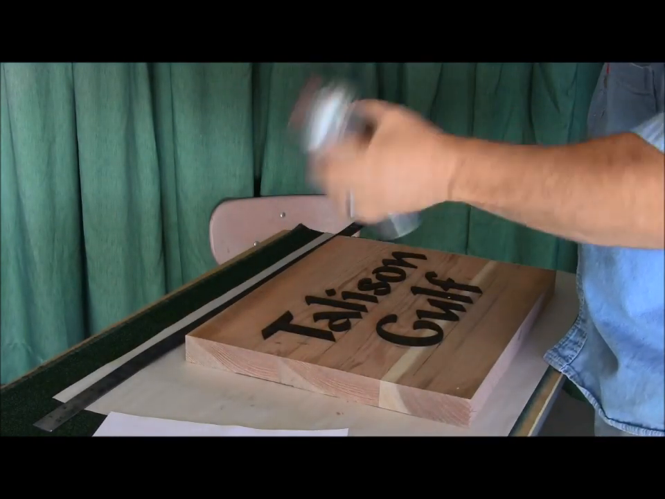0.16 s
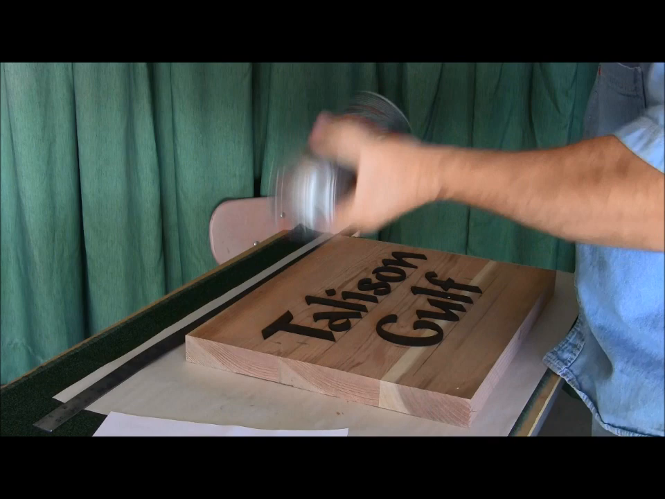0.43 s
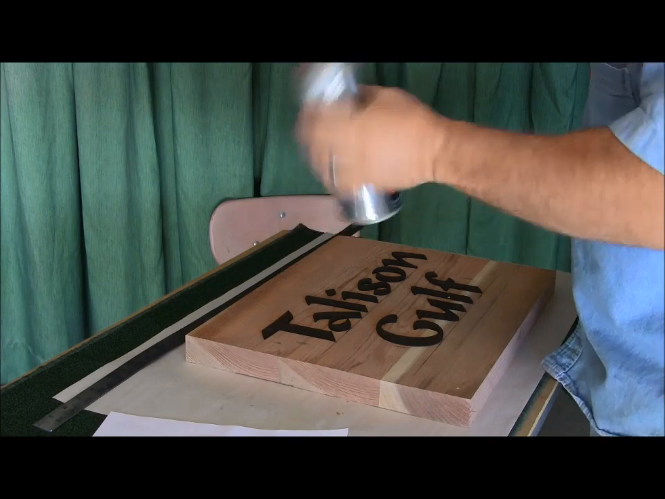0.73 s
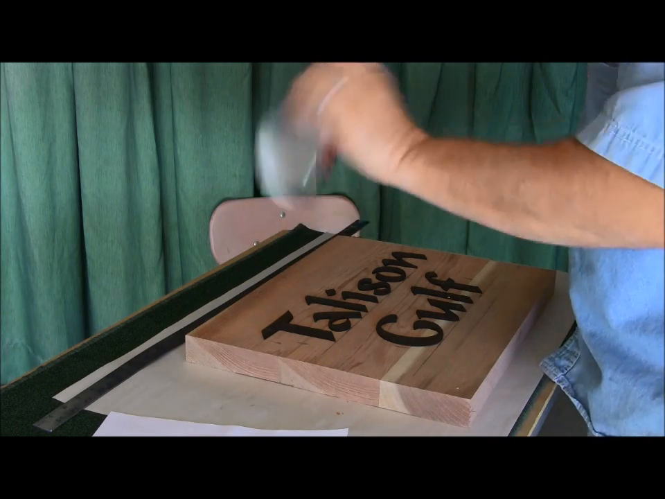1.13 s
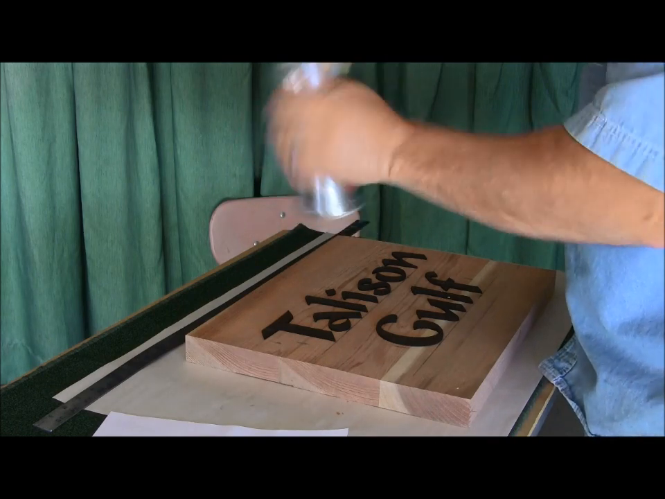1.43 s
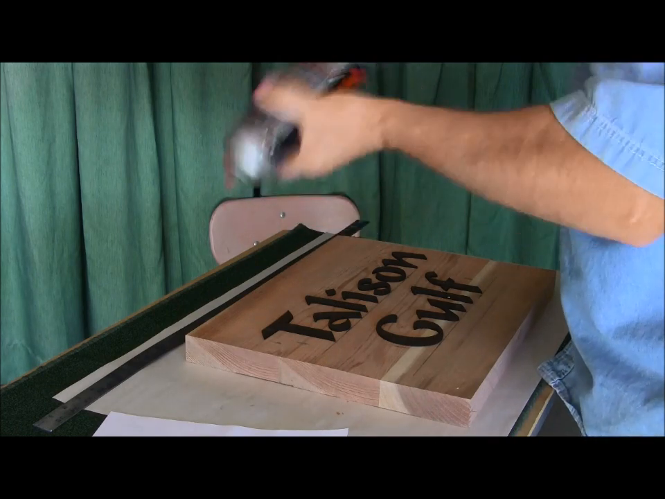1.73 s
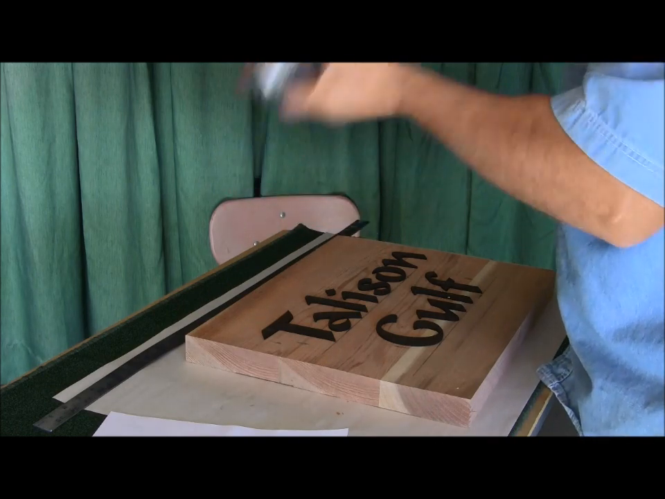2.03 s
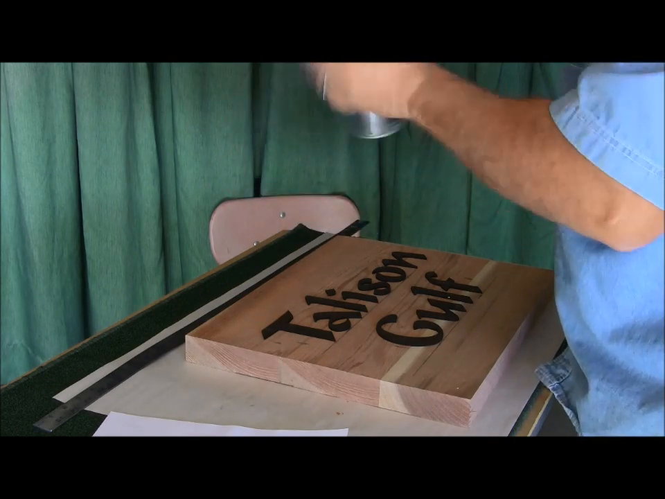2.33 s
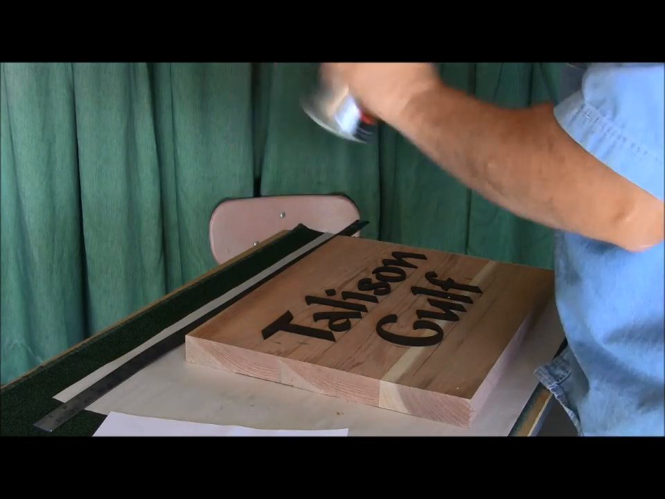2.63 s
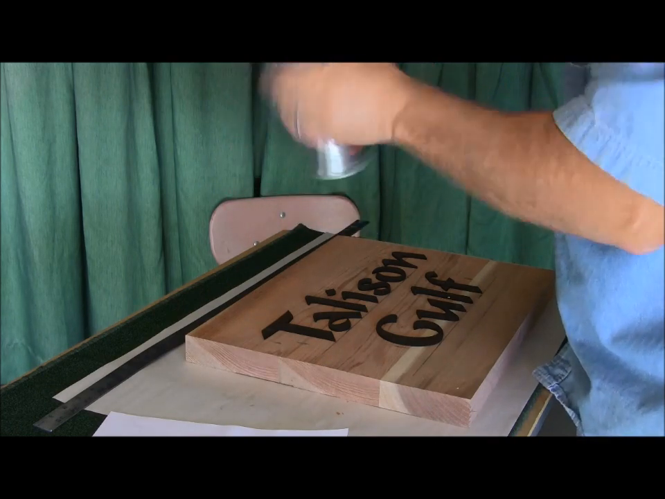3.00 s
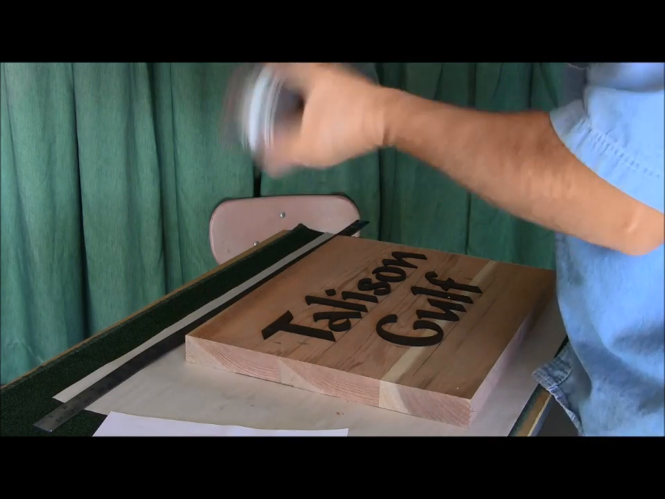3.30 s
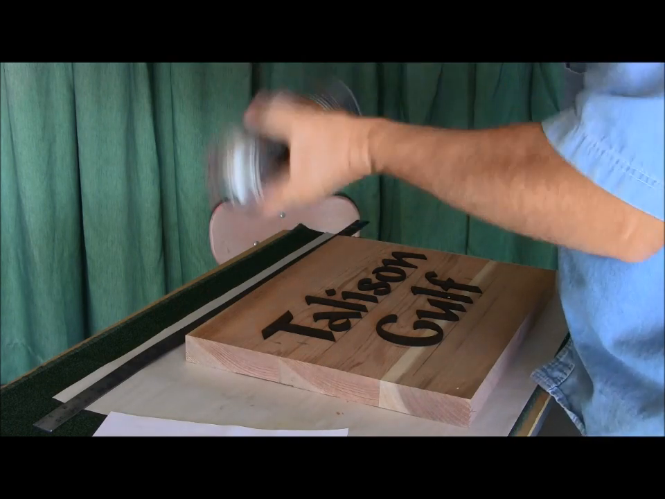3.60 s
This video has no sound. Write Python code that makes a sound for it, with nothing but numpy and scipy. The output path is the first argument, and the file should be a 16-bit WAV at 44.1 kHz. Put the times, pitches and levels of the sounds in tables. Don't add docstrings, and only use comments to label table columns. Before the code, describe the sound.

A steel mixing ball clatters in a vigorously shaken aerosol can, hard bright clacks mixed with quick rebounds, ticks and soft liquid-cushioned knocks, continuous from start to end, close microphone in a small workshop.

```python
import sys
import numpy as np
from scipy import signal
from scipy.fft import rfft, irfft, next_fast_len
from scipy.io import wavfile

SR = 44100
rng = np.random.default_rng(int(sys.argv[2]) if len(sys.argv) > 2 else 0)


def gain_from_db(level_db):
    decades = np.asarray(level_db, float) / 20
    return 10 ** decades


def unload_audio(sound):
    columns = np.transpose(np.atleast_2d(sound))
    steps = np.round(np.clip(columns, -1, 1) * 32767)
    wavfile.write(sys.argv[1], SR, steps.astype(np.int16))


N = 165375

# (frequency [Hz], level [dB])
SHELL_MODES = [(780, -34), (1050, -20.5), (1320, -12.5), (1650, -19.5), (2100, -5.5), (2750, -5),
               (3400, 0.5), (4200, 1.5), (4900, -2.5), (6100, 1)]
# (delay [s], level [dB])
ECHOES = [(.0052, -13)]
# (time [s], level [dB], strongest shell mode [Hz])
SOFT_KNOCKS = [(0.071, -20, 1780), (0.083, -25, 1980), (0.332, -13.5, 1720), (0.349, -21, 1650),
               (0.624, -13.5, 2410), (0.914, -18, 1030), (0.931, -18, 2010), (1.041, -8.5, 2340),
               (1.397, -9.5, 2470), (1.41, -9.5, 1840), (1.668, -3.5, 2200), (1.715, -0.5, 2400),
               (1.722, -8, 2130), (1.788, -19, 2120), (1.931, -19, 1470), (1.944, -15, 2280),
               (2.186, -18, 2290), (2.206, -15, 2310), (2.24, -11, 2280), (2.465, -15, 1840),
               (2.479, -23.5, 930), (2.485, -16, 1950), (2.511, -7, 2000), (2.739, -17, 1850),
               (2.747, -13, 2090), (2.815, -4.5, 2130), (3.027, -8.5, 2010), (3.121, -8.5, 2360),
               (3.142, -15.5, 1950), (3.567, -9, 1960)]
# (time [s], level [dB], strongest shell
# mode [Hz], crack level relative to the ring [dB])
EARLY_BLOWS = [(0.118, -5.5, 3790, -2), (0.136, -3, 3570, -8.5), (0.1824, -5.5, 3600, -17),
               (0.2814, -6.5, 4720, -17), (0.3962, -2, 3940, -5.5), (0.429, -3, 4000, -9),
               (0.525, -8.5, 4800, -15), (0.636, -11, 3350, -3.5), (0.6477, -3, 3280, -7),
               (0.6703, -4.5, 3800, -21), (0.6806, -4, 4400, -23), (0.7315, -1.5, 4850, -18),
               (0.7586, -6, 3120, -12), (0.7825, -7.5, 3800, -26), (0.7888, -9.5, 4000, -32),
               (0.8474, -4.5, 5170, -21), (0.956, -2, 3870, -11.5), (0.9672, -4.5, 4250, -13),
               (0.9887, -3.5, 3240, -10), (1.0784, -1.5, 4080, -14), (1.101, -25, 4160, -13),
               (1.117, -4.5, 3350, -17), (1.1648, -3, 3100, -9.5), (1.1915, -3.5, 4520, -11),
               (1.238, -4.5, 3400, -13), (1.2761, -7, 3480, -9), (1.324, -2.5, 3170, -15),
               (1.328, -9, 3920, -31), (1.3914, -5.5, 3380, -16)]
MIDDLE_BLOWS = [(1.442, -4.5, 2820, -3.5), (1.503, -5, 3700, -13.5), (1.5399, -6, 4040, -10),
                (1.564, -4, 3150, -14), (1.6148, -1.5, 3670, -14), (1.6308, -5.5, 3400, -12),
                (1.738, -6.5, 3230, 0.5), (1.755, -12, 3830, -26), (1.7606, -7.5, 3420, -28),
                (1.8125, -5, 3980, -3.5), (1.8516, -5.5, 3420, -25), (1.8848, -5, 3200, -12),
                (1.889, -19, 4130, -30), (1.9103, -4.5, 4170, -60), (1.9214, -7, 3250, -14),
                (1.9584, -4.5, 2430, -5), (1.9788, -9, 2300, 3), (2.017, -6.5, 3520, -10),
                (2.0569, -7, 3580, -1), (2.1032, -9.5, 4600, -31), (2.135, -11, 3900, -30),
                (2.1475, -9, 3220, -56), (2.1771, -6.5, 4040, -12.5), (2.2211, -4.5, 3660, -7.5),
                (2.3317, -1, 4310, -15.5), (2.435, -5, 3400, -23), (2.5012, -7, 3670, 0),
                (2.5322, -1.5, 3060, -16)]
LATE_BLOWS = [(2.578, -3, 3600, -9), (2.6015, -8, 3470, -31), (2.6332, -6, 3070, -14),
              (2.6476, -4, 4120, -18), (2.695, -5, 3450, -23), (2.7575, -1.5, 3540, -12),
              (2.781, -6.5, 3400, -6), (2.848, -2.5, 3600, -7.5), (2.931, 1, 4020, -16),
              (2.9405, -22, 3400, -1), (2.9546, -13, 3400, -10), (2.9663, -8, 3480, -36),
              (3.059, -2, 3750, -4.5), (3.078, -9, 3330, -22), (3.1809, -3, 3250, -5.5),
              (3.217, -3, 3380, -12.5), (3.2263, -5, 3150, -16), (3.2651, -5.5, 3040, -9),
              (3.2841, -3.5, 3530, -11), (3.3388, -2, 3110, -14), (3.3703, -1.5, 4830, -14),
              (3.427, -6, 3950, -9), (3.4442, -1.5, 4320, -32), (3.4947, -2.5, 2460, -15),
              (3.5427, -11.5, 2210, -30), (3.5789, 0, 3540, -15.5), (3.6726, -3.5, 3870, -3.5),
              (3.6941, -7, 4500, -7)]
# (time [s], level [dB])
JOLTS = [(0.12, -12), (0.649, -18), (1.0775, -10), (1.1646, -2), (1.324, -11), (1.502, -8), (1.614, -17),
         (1.737, -14), (1.814, -16), (1.991, -21), (2.648, -9), (2.931, -3.5), (3.079, -5), (3.181, -12),
         (3.284, -13), (3.694, -15)]
# (time [s], level [dB])
TAPS = [(0.1309, -14), (0.4209, -19), (0.5867, -17), (0.7163, -11.5), (0.7483, -14.5), (1.5093, -16),
        (1.7397, -11), (1.7689, -19.5), (1.8891, -26), (1.9961, -12), (2.1884, -17), (2.2862, -14),
        (2.3339, -24), (2.3394, -26), (2.5236, -16), (2.6478, -17), (2.7038, -23), (2.7224, -20),
        (2.7531, -22), (2.7824, -23), (2.7895, -20), (3.1808, -17), (3.2176, -20), (3.2369, -23),
        (3.249, -22), (3.3486, -16), (3.3712, -14), (3.515, -14), (3.5982, -25), (3.6338, -10)]
# (time [s], level [dB])
TICKS = [(0.1547, -9), (0.229, -14), (0.2375, -15), (0.2898, -14.5), (0.4491, -12.5), (0.4559, -10.5),
         (0.5162, -8), (0.53, -11.5), (0.737, -8.5), (0.799, -15), (0.8109, -7), (0.9675, -3.5),
         (1.1028, -4), (1.1075, -16), (1.2283, -7), (1.368, -13.6), (1.372, -9), (1.4203, -17),
         (1.4546, -5.5), (1.4963, -12), (1.7431, -9), (1.749, -11), (1.8178, -10), (1.8891, -11),
         (1.9683, -6), (1.9854, -15), (2.007, -5.5), (2.365, -13.5), (2.3782, -12), (2.3985, -16),
         (2.4014, -17), (2.5172, -10.5), (2.5454, -8), (2.6783, -11.5), (2.6862, -13.5), (2.8583, -11),
         (2.9541, -10.5), (3.3048, -8), (3.3314, -15.4), (3.375, -6), (3.4711, -16), (3.5927, -9),
         (3.598, -8), (3.6214, -9), (3.7005, -13.5)]
# (time [s], level [dB])
EARLY_REBOUNDS = [(0.4126, -2), (0.419, -4.5), (0.4641, -8), (0.4832, -8), (0.4891, -7), (0.6966, -5),
                  (0.7405, -18), (0.993, -9), (1.215, -7), (1.2893, -5.5), (1.3382, -17), (1.346, -10),
                  (1.4555, -23), (1.4614, -4), (1.7288, -3), (1.7301, -5), (1.7342, -12), (3.0653, -11.5),
                  (3.076, -2.5), (1.7496, -31), (1.914, -7.5), (1.9884, -4.5)]
LATE_REBOUNDS = [(2.2335, -7.5), (2.254, -4), (2.268, -0.5), (2.278, -6.5), (2.2832, -23), (2.523, -2.5),
                 (2.537, -9), (2.6656, -8), (2.784, -8), (2.796, -3.5), (2.8039, -2.5), (2.809, -7),
                 (2.8737, -5.5), (3.2914, -9.5), (3.6119, -9), (3.6166, -3.5), (3.621, -14), (3.6288, -2.5)]
EXTRA_REBOUNDS = [(0.1698, -8), (0.205, -10), (.233, -8.5), (.575, -9), (0.6449, -4), (1.2057, -8.5),
                  (3.3985, -8)]

PLACES = 10
REBOUND_HZ, REBOUND_CRACK_DB, KNOCK_CRACK_DB = 3400, -14, -26
BLOW_T60_S, KNOCK_T60_S, TICK_T60_S = 0.0065, 0.003, 0.004


def band(x, lo_hz, hi_hz, order=2):
    sos = signal.butter(order, [lo_hz, hi_hz], "bandpass", fs=SR, output="sos")
    return signal.sosfilt(sos, x)


def fade(t, t60):
    return np.exp(-np.log(1000) * t / t60)


def columns(table):
    return np.array(table, float).T


def scatter(times, db):
    return db * rng.standard_normal(len(times))


def peak_normal(hits):
    return hits / np.abs(hits).max(axis=1, keepdims=True)


def strike(times, db, main_hz, crack_db, t60=BLOW_T60_S):
    t = np.arange(640) / SR
    main_hz = main_hz[:, None]
    mode_hz, mode_db = columns(SHELL_MODES)
    detune, weight = rng.standard_normal((2, len(times), len(mode_hz)))
    octaves_above = np.maximum(np.log2(mode_hz / 1.6 / main_hz), 0)
    gain_db = mode_db + 2.5 * weight - 12 * octaves_above
    ring = np.sin(2 * np.pi * main_hz * t) * fade(t, t60)
    for k, hz in enumerate(mode_hz):
        bent_hz = hz * (1 + 0.08 * detune[:, k, None])
        mode_t60 = min(19.8 / hz, t60)
        ring += gain_from_db(gain_db[:, k, None]) * np.sin(2 * np.pi * bent_hz * t) * fade(t, mode_t60)
    ring *= 1 - np.exp(-t * main_hz / 2.62)
    crack = band(rng.standard_normal(ring.shape), 7520, 11770) * fade(t, 0.0042)
    hits = peak_normal(ring) + peak_normal(crack) * gain_from_db(crack_db)[:, None]
    hits *= gain_from_db(db)[:, None]
    tracks = np.zeros((PLACES, N + len(t)))
    place = rng.integers(PLACES, size=(len(times), 1))
    samples = (times * SR).astype(int)[:, None] + np.arange(len(t))
    np.add.at(tracks, (place, samples), hits)
    return tracks[:, :N]


def room_tone():
    hum = band(rng.standard_normal((2, N)), 27, 1100, order=1)
    hum *= gain_from_db(-57) / hum.std()
    hum[1] *= 0.36
    return hum


def skitter():
    blows = columns(EARLY_BLOWS + MIDDLE_BLOWS + LATE_BLOWS)[:2]
    rebounds = columns(EARLY_REBOUNDS + EXTRA_REBOUNDS + LATE_REBOUNDS)
    unheard_blow = np.array([[-0.008], [0]])
    stir_times, stir_db = np.hstack([blows, rebounds, unheard_blow])
    chance = rng.random((3000, 3))
    contacts_per_s = 490
    times = np.cumsum(-np.log(1 - chance[:, 0])) / contacts_per_s
    heard = times < N / SR
    times, chance = times[heard], chance[heard]
    since = times[:, None] - stir_times
    motion = (since > 0) * (gain_from_db(stir_db) * fade(np.abs(since), 0.16)) ** 2
    stir = np.sqrt(np.sum(motion, axis=1) + 1e-6)
    db = -12 - 8 * chance[:, 1] + 20 * np.log10(stir)
    main_hz = 2910 * gain_from_db(10 * (chance[:, 2] - 0.5))
    return strike(times, db, main_hz, np.full(len(times), REBOUND_CRACK_DB), TICK_T60_S)


def soft_knocks():
    times, db, main_hz = columns(SOFT_KNOCKS)
    crack_db = KNOCK_CRACK_DB + scatter(times, 2)
    knocks = strike(times, db, main_hz, crack_db, KNOCK_T60_S)
    return gain_from_db(1) * band(knocks, 520, 2700) + gain_from_db(-12) * knocks


def hard_blows():
    return strike(*columns(EARLY_BLOWS + MIDDLE_BLOWS + LATE_BLOWS))


def input_jolts():
    times, db = columns(JOLTS)
    jolts = np.zeros(N)
    jolts[(times * SR).astype(int)] = gain_from_db(db)
    return band(jolts, 12, 350, order=1)


def dull_taps():
    times, db = columns(TAPS)
    main_hz = 1446 * gain_from_db(scatter(times, 0.8))
    return strike(times, db, main_hz, KNOCK_CRACK_DB + scatter(times, 2), KNOCK_T60_S)


def small_ticks():
    times, db = columns(TICKS)
    main_hz = REBOUND_HZ * gain_from_db(scatter(times, 2.7))
    return strike(times, db, main_hz, REBOUND_CRACK_DB + scatter(times, 4), TICK_T60_S)


def rebounds_of_ball():
    times, db = columns(EARLY_REBOUNDS + EXTRA_REBOUNDS + LATE_REBOUNDS)
    main_hz = REBOUND_HZ * gain_from_db(scatter(times, 1))
    return strike(times, db, main_hz, REBOUND_CRACK_DB + scatter(times, 4))


def can():
    steel = hard_blows() + small_ticks() + rebounds_of_ball()
    return skitter() + soft_knocks() + steel + dull_taps()


def room():
    t = np.arange(SR // 3) / SR
    low, high = rng.standard_normal((2, 2, PLACES, len(t)))
    high[1] *= gain_from_db(10)
    tail = band(low, 133, 2580, order=1) * fade(t, 0.31)
    tail += 1.45 * band(high, 2360, 18000, order=1) * fade(t, 0.079)
    tail *= 1 - np.exp(-t / 0.005)
    tail *= gain_from_db(-8.5) / np.sqrt(np.sum(tail[0] ** 2) / PLACES)
    tail[1] *= gain_from_db(-16.5)
    tail[0, :, 0] = 1
    for delay, db in ECHOES:
        lag = (delay * SR * (1 + 0.06 * rng.standard_normal(PLACES))).astype(int)
        tail[0, np.arange(PLACES), lag] += gain_from_db(db)
    return tail


def scene():
    size = next_fast_len(N + SR)
    spectrum = (rfft(can(), size) * rfft(room(), size)).sum(axis=1)
    mid, side = irfft(spectrum, size)[:, :N]
    side = side + gain_from_db(4) * band(side, 120, 730) + gain_from_db(-2) * band(side, 10500, 16000)
    mid, side = band(np.array([mid, side]), 767, 17000, order=1)
    tone_mid, tone_side = room_tone()
    mid = mid + input_jolts() + tone_mid
    side = side + tone_side
    return np.array([mid + side, mid - side])


def roll_off(x):
    return signal.sosfilt(signal.butter(12, 16470, fs=SR, output="sos"), x)


def record(dry):
    x = dry * gain_from_db(3.5)
    x = x + band(np.clip(x, -1, 1) - x, 300, 16000)
    x = signal.sosfilt(signal.butter(3, 13540, fs=SR, output="sos"), x)
    return roll_off(0.9 * x)


dry = scene()
out = record(dry)
unload_audio(out)
```